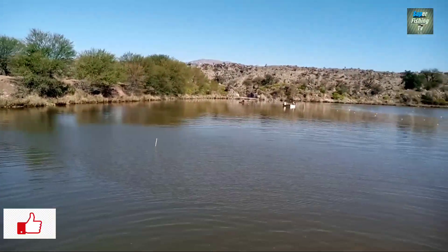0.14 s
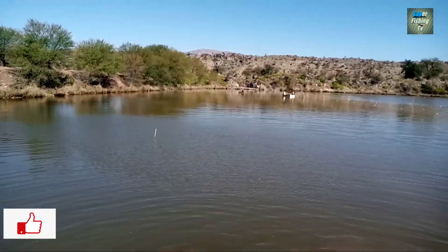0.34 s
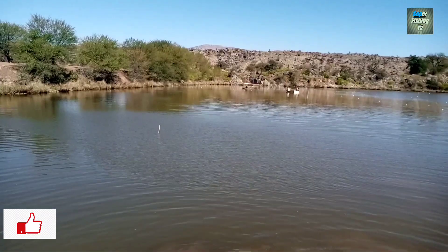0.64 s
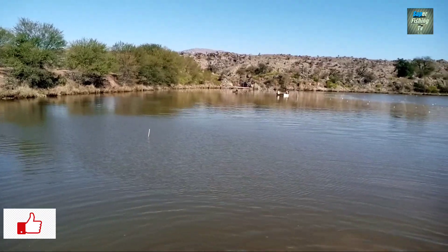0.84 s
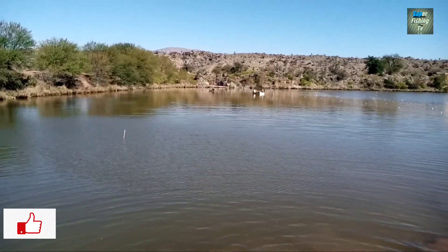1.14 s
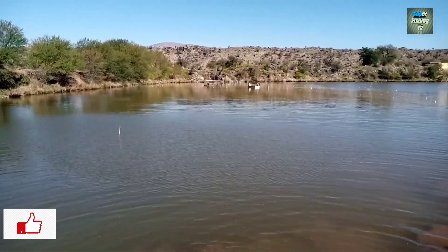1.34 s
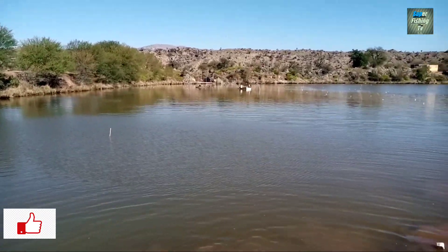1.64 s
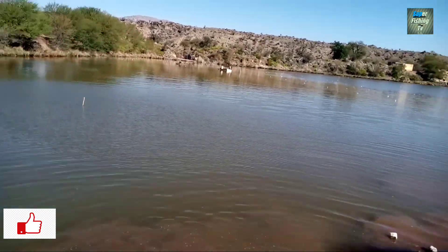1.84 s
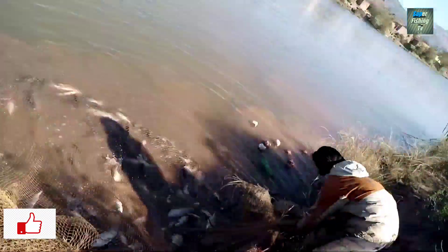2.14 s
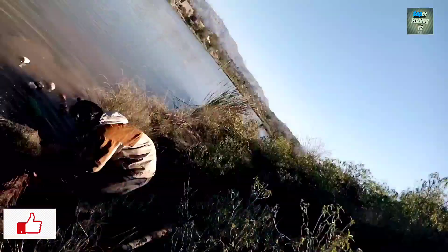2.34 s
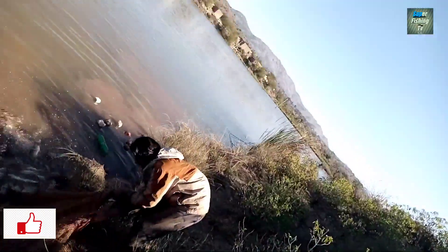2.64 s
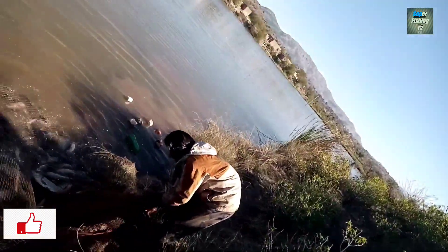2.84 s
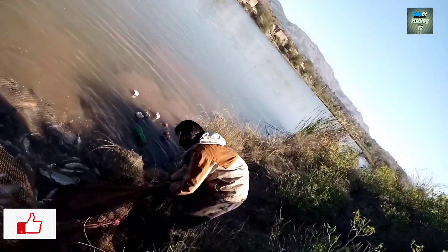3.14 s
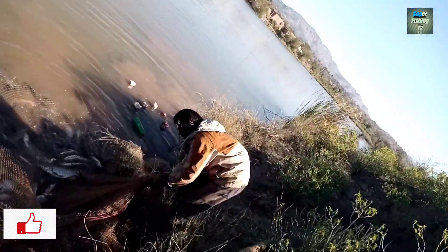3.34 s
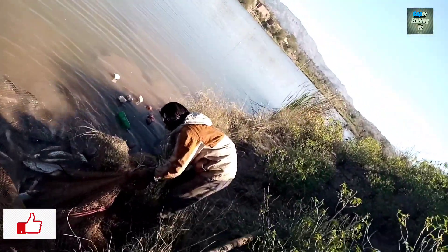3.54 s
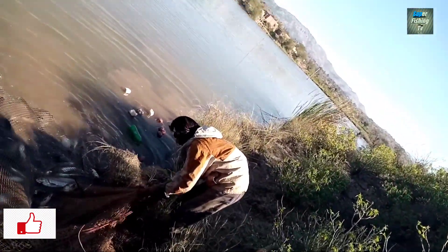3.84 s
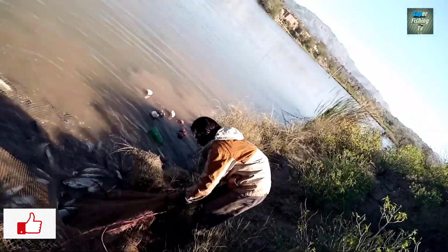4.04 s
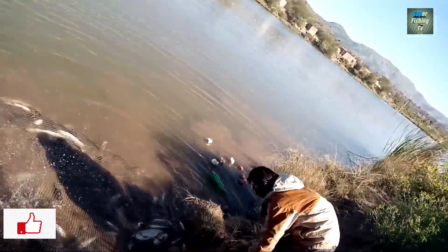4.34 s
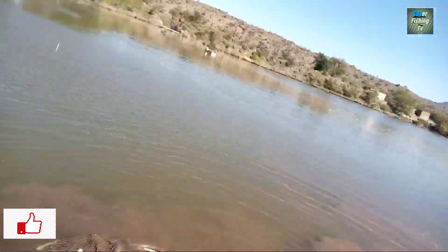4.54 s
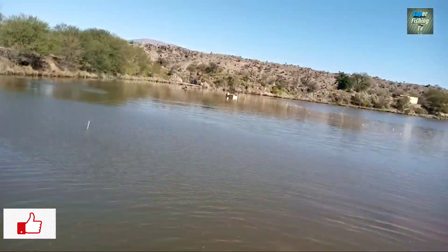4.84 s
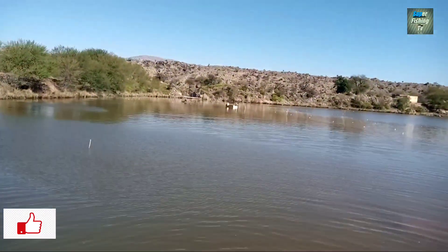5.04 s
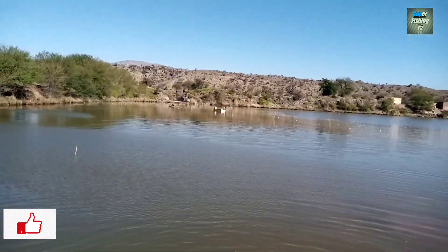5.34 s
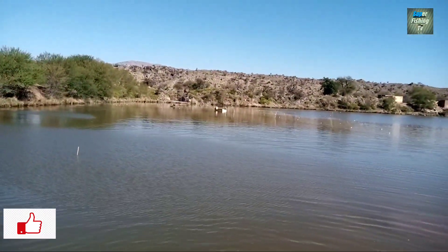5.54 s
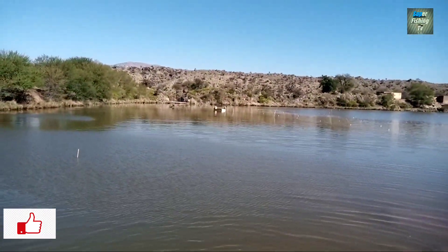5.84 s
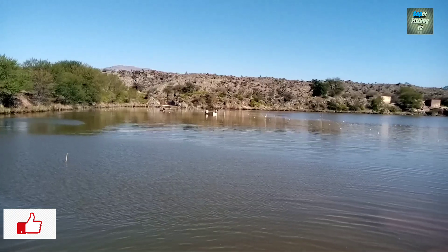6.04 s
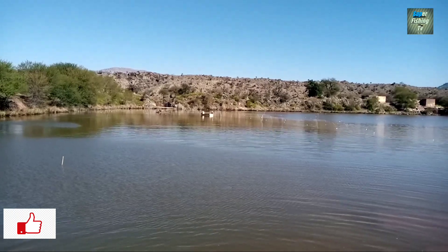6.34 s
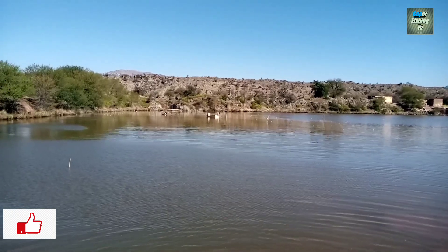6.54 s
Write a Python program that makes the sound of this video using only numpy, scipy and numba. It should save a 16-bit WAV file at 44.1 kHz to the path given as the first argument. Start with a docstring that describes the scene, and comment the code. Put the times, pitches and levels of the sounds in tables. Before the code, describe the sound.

At an open lake shore, a wet net drains close by. Bright, bubbly running water starts strongest and thins within a second. A quick, hard flurry of splashes hits near 1.5 seconds, then drips and small slaps. Trickling returns around 2.7 and 4.2 seconds, then leaves sparse plinks. Low wind puffs bump a phone microphone a metre or two away.

```python
"""A lake shore: a wet fishing net is hauled through the shallows, a metre or two from a phone.
Water streams off the mesh: swarms of damped sines for drops and bubbles, noise bands for fine spray.
Single bubbles and droplets ring as damped sines; drops and fish slap the surface as filtered noise bursts.
Wind on the microphone is low noise shaped by gusts, plus single-swing puffs; a faint hiss lies behind."""
import sys
import numpy as np
from scipy import signal
from scipy.fft import rfft, irfft
from scipy.io import wavfile
from scipy.ndimage import uniform_filter1d
from numba import njit

SR = 44100
rng = np.random.default_rng(int(sys.argv[2]) if len(sys.argv) > 2 else 0)


def output_pcm(signal):
    """Save a mono or channel-first signal as 16-bit PCM at the path in sys.argv[1].

    Samples are clipped to [-1, 1] before scaling.
    """
    pcm = np.clip(np.atleast_2d(signal).T, -1, 1) * 32767
    wavfile.write(sys.argv[1], SR, np.round(pcm).astype(np.int16))


N = 295068

# All levels are ahead of the microphone colour.
# water running off the net, before mix gains: time_s, spray_db, trickle_db, gurgle_db
NET_FLOW = [(0.0, -44, -44.5, -49), (0.2, -46.5, -51, -51), (0.6, -48, -55.5, -54.5),
            (0.84, -53, -60, -64.5), (1.0, -59.5, -62.5, -75.5), (1.55, -60.5, -68.5, -74.5),
            (1.88, -56, -64, -68), (2.42, -64.5, -66.5, -76.5), (2.53, -60, -60.5, -64),
            (2.63, -49.5, -54, -52), (2.85, -51.5, -54, -59), (3.1, -58.5, -69.5, -71),
            (3.33, -62, -72, -72.5), (3.55, -68, -78.5, -91), (3.9, -67, -66, -73), (4.0, -60, -62.5, -78),
            (4.12, -50, -53.5, -52.5), (4.3, -52, -57, -64.5), (4.62, -54.5, -63.5, -70.5),
            (4.79, -64.5, -78.5, -81), (4.95, -66.5, -83, -100), (5.07, -65.5, -67.5, -74.5),
            (5.19, -66.5, -76, -95), (5.33, -59.5, -57.5, -71), (5.44, -58.5, -62.5, -75),
            (5.68, -65, -68, -72.5), (5.82, -68.5, -87.5, -91.5), (6.0, -69.5, -79, -80),
            (6.1, -67, -63.5, -75.5), (6.26, -59, -64, -70), (6.4, -60.5, -63.5, -80),
            (6.69, -66, -70.5, -76)]
# bubbles that stand out, level before swell and fade, pitch at the start, rise reached at half the fade:
# start_s, level_db, pitch_hz, fade_60db_cycles, rise_share
SINGLE_BUBBLES = [(0.319, -34.5, 1046, 39, 0.12), (0.414, -32, 3187, 33, 0.17),
                  (0.435, -37, 1250, 23, 0.42), (0.669, -36.5, 1010, 27, 0.0), (0.775, -54, 580, 52, 0.86),
                  (0.807, -41, 1290, 17, 0.25), (0.863, -44, 792, 52, 0.0), (0.922, -42.5, 2750, 59, 0.029),
                  (0.99, -42.5, 1050, 71, 0.019), (1.067, -47, 612, 49, 0.0), (1.1, -44.5, 1170, 26, 0.17),
                  (1.159, -41.5, 3200, 54, 0.34), (1.169, -37.5, 1090, 51, 0.077),
                  (1.28, -39, 1000, 44, 0.16), (1.29, -44, 352, 28, 0.0), (1.365, -50.5, 2980, 90, 0.0),
                  (1.638, -50, 820, 38, 0.48), (1.672, -44.5, 319, 46, 0.44),
                  (1.675, -39.5, 1480, 37, 0.04), (1.678, -42, 3580, 90, 0.0),
                  (1.692, -45.5, 765, 28, 0.97), (1.731, -37, 485, 9, 0.15), (1.855, -39, 1060, 14, 0.14),
                  (1.879, -41, 2600, 59, 0.0), (1.897, -38, 895, 10, 0.39), (2.032, -53, 460, 81, 0.54),
                  (2.069, -38, 2760, 28, 0), (2.131, -48, 1500, 52, 0.78), (2.148, -48, 340, 29, 0.057),
                  (2.172, -47.5, 970, 60, 0.13), (2.208, -47.5, 2390, 63, 0.74),
                  (2.322, -50, 1160, 25, 0.27), (2.415, -45, 2820, 36, 0.0), (2.417, -51, 282, 32, 0),
                  (2.488, -49.5, 506, 44, 0.58), (2.525, -52, 248, 37, 0.38), (2.554, -42.5, 846, 35, 0.26),
                  (2.647, -28.5, 555, 13.5, 0.65), (2.763, -43, 736, 100, 0.97),
                  (2.869, -41, 2350, 54, 0.19), (2.912, -40.5, 590, 24, 0.15),
                  (2.966, -44.5, 444, 36, 0.019), (3.053, -56.5, 447, 62, 1), (3.085, -44.5, 2180, 56, 0.0),
                  (3.114, -54, 520, 34, 0.97), (3.151, -46, 1670, 36, 0.47), (3.231, -55.5, 642, 89, 0.3),
                  (3.326, -48.5, 2030, 50, 0.98), (3.359, -49.5, 1750, 39, 0.23),
                  (3.392, -53.5, 1490, 45, 0.24), (3.455, -55.5, 1580, 104, 0.96),
                  (3.497, -53.5, 675, 90, 0.06), (3.658, -55, 3208, 93, 0.0),
                  (3.724, -51.5, 2200, 52, 0.13), (3.738, -52.5, 1500, 96, 0.49),
                  (3.765, -49.5, 1340, 47, 0.36), (3.813, -51, 580, 44, 0.04), (3.827, -38.5, 2920, 27, 0),
                  (3.847, -56, 494, 102, 0.19), (3.965, -48.5, 724, 19, 0.025),
                  (3.983, -41.5, 2338, 28, 0.1), (4.076, -33, 570, 25, 0.58),
                  (4.08, -32.5, 1420, 21, 0.086), (4.135, -37, 3934, 58, 0), (4.211, -38.5, 470, 21, 0.015),
                  (4.326, -45, 920, 28, 0.49), (4.36, -47.5, 242, 27, 0.0054), (4.387, -47, 567, 67, 0.0),
                  (4.507, -40.5, 1572, 16, 0.04), (4.545, -44.5, 418, 24, 0.025),
                  (4.686, -50.5, 785, 97.5, 1), (4.733, -56.5, 910, 61, 0.43), (4.845, -55, 964, 50, 0.0),
                  (4.861, -43, 3020, 46, 0.079), (4.876, -40.5, 2180, 30, 0.21),
                  (4.973, -49.5, 1020, 73, 0.31), (4.997, -48, 1390, 49, 0.25),
                  (5.039, -51.5, 1950, 66, 0.0), (5.07, -49.5, 1040, 42, 0.72),
                  (5.098, -47.5, 787, 25, 0.0), (5.121, -46.5, 2397, 24, 0.0),
                  (5.153, -53, 1615, 41, 0.013), (5.216, -48.5, 1045, 52, 0.23),
                  (5.237, -48, 1080, 70, 0.18), (5.26, -56.5, 400, 40, 0.0), (5.261, -43, 3180, 47, 0.15),
                  (5.384, -36.5, 1020, 39, 0.01), (5.443, -49, 836, 34, 0.0), (5.469, -41, 2600, 68, 0.1),
                  (5.471, -45, 1870, 48, 0.0), (5.57, -44, 1300, 80, 0.0), (5.71, -54, 1270, 70, 0.0),
                  (5.814, -58, 1970, 73, 0.0), (5.855, -49, 2690, 58, 0.13), (5.881, -54, 3540, 55, 0.1),
                  (6.001, -59, 1036, 60, 0.045), (6.075, -46, 644, 75, 0.99), (6.172, -34.5, 985, 30, 0.45),
                  (6.248, -44.5, 874, 36, 0.16), (6.287, -48, 1020, 34, 0.61),
                  (6.349, -44.5, 2810, 84, 0.18), (6.386, -45, 2260, 54, 0.38),
                  (6.448, -48, 1130, 58, 0.0037), (6.529, -51, 710, 47, 0.0), (6.668, -49, 557, 57, 0.043),
                  (0.092, -22.5, 4270, 40, 0), (0.218, -43, 1190, 90, 0.25), (0.281, -43, 1080, 58, 1),
                  (0.565, -38.5, 900, 16, 0.16), (0.618, -47, 1305, 90, 0.0), (1.233, -59, 780, 88, 0.49),
                  (1.256, -55, 670, 69, 0.9), (1.398, -52, 1783, 36, 0.3), (1.522, -50, 2455, 90, 0.0),
                  (1.456, -30.5, 245, 7, 0), (1.46, -27, 348, 13, 0.025), (2.034, -44.5, 304, 4, 0.38),
                  (1.8, -59, 623, 40, 0.3), (1.93, -52, 1010, 40, 0.1), (2.25, -58.5, 707, 42, 0.35),
                  (1.715, -41, 3071, 34, 0.5), (1.762, -49, 2520, 90, 0.0), (1.865, -54, 420, 59, 0.9),
                  (1.997, -50, 1680, 42, 0), (2.398, -57.5, 820, 95, 0.62), (2.689, -50, 2280, 90, 0.0),
                  (2.695, -48, 427, 70, 0.68), (3.09, -42, 3640, 56, 0.77), (3.12, -53.5, 827, 46, 0.06),
                  (3.237, -52.5, 2040, 56, 0.0), (3.272, -54.5, 654, 45, 0.12),
                  (3.283, -55, 1840, 59, 0.17), (3.354, -58, 703, 60, 0.0), (3.505, -61, 1360, 90, 0.88),
                  (3.54, -63, 2360, 90, 0.0), (3.581, -62, 1077, 36, 0.86), (3.899, -56, 1970, 90, 0.0),
                  (3.969, -60, 313, 59, 0.0), (4.051, -49, 577, 78, 0.26), (4.086, -56, 175, 23, 0.1),
                  (4.342, -53, 600, 59, 0.94), (4.425, -53, 301, 44, 0.032), (4.595, -50, 1400, 51, 0.13),
                  (4.661, -58, 628, 88.5, 0.9), (4.885, -60, 910, 43, 0.0), (4.925, -57, 2020, 91, 0.061),
                  (5.25, -53, 770, 70, 0), (5.297, -53, 630, 34, 0.9), (5.308, -55, 976, 59, 0.25),
                  (5.333, -59, 650, 82, 0.6), (5.343, -57, 1160, 99, 0.34), (5.368, -42, 1160, 29, 0.0),
                  (5.405, -43.5, 830, 27, 0.0), (5.525, -56, 920, 23, 0.13), (5.684, -58, 2440, 58, 0.0),
                  (5.768, -61.5, 1990, 67, 0.0), (5.838, -63, 1050, 49, 0), (6.056, -46, 1330, 20, 0.99),
                  (6.073, -58, 1780, 86, 0.09), (6.295, -51, 544, 40, 0.0), (6.319, -52, 1670, 54, 0.99),
                  (6.403, -47, 980, 60, 0.1), (6.426, -53, 715, 41, 0.03), (6.638, -53, 1234, 66, 0.97),
                  (6.667, -45, 3270, 32, 0.0)]
# slaps on the surface, the quick run near 1.45 s a thrashing fish:
# mid_swell_s, crack_peak_db, crack_pitch_hz, body_peak_db
SURFACE_SLAPS = [(0.0888, -31, 4170, -50), (0.4132, -35, 3400, -39), (0.4324, -25, 6130, -43),
                 (0.5927, -30, 2800, -38.5), (0.7638, -34, 7450, -63), (0.804, -22.5, 4900, -38.5),
                 (1.2128, -42.5, 6400, -65), (1.436, -26, 4180, -37), (1.442, -25.5, 7300, -29.5),
                 (1.449, -23, 5300, -33.5), (1.455, -20.5, 6610, -33.5), (1.4599, -19.5, 2780, -24.5),
                 (1.465, -17.5, 4640, -28), (1.6593, -37, 3430, -57), (1.671, -32.5, 4470, -45),
                 (1.6806, -28.5, 6600, -43), (1.7328, -33.5, 6800, -46), (1.7684, -31.5, 9100, -42.5),
                 (1.8416, -39, 9030, -50), (1.963, -36.5, 7340, -66), (1.9927, -33.5, 4200, -68),
                 (2.0346, -40, 2950, -44), (2.0501, -36, 6100, -45), (2.0734, -35.5, 6300, -63),
                 (2.0995, -39.5, 5070, -68), (2.1602, -36, 8300, -49), (2.316, -36.5, 7040, -48),
                 (2.6132, -43, 2520, -46), (2.6278, -30.5, 3830, -37.5), (2.6722, -36, 9090, -44),
                 (2.7265, -45, 2690, -44), (2.7349, -30.5, 4630, -38.5), (2.8405, -27, 7500, -36),
                 (2.891, -38, 2600, -42), (2.9325, -24, 6850, -43), (2.9366, -35, 6500, -48),
                 (3.0265, -35.5, 4810, -63), (3.051, -37.5, 5960, -60), (3.0724, -38, 2990, -48),
                 (3.3575, -39, 4500, -59), (3.6248, -45, 3130, -73), (3.694, -48.5, 5900, -76),
                 (3.7983, -44, 2790, -56), (3.907, -46, 11150, -62), (3.9707, -41.5, 2550, -54),
                 (4.0476, -36.5, 5900, -39.5), (4.076, -36, 2680, -38), (4.1038, -46, 4330, -39.5),
                 (4.114, -42, 3340, -31.5), (4.1262, -29.5, 6230, -37.5), (4.1663, -37.5, 5800, -37),
                 (4.2677, -22, 9300, -32.5), (4.5525, -35, 4700, -63), (4.6947, -40.5, 4340, -49),
                 (4.9734, -37, 6100, -66), (5.1224, -39, 9600, -60), (5.1482, -42.5, 3600, -59),
                 (5.2766, -40.5, 4070, -56), (5.3683, -44, 2820, -54), (5.4151, -37, 4800, -56),
                 (5.686, -44.5, 4160, -69), (5.782, -57, 6100, -76), (6.164, -44, 3280, -46),
                 (6.5686, -39.5, 3430, -60)]
# droplets that tick loudest, level before swell and fade: start_s, level_db, pitch_hz
DROPLET_TICKS = [(0.433, -30, 10500), (0.5417, -31, 9000), (0.806, -21, 9400), (1.217, -40, 9700),
                 (1.3972, -45, 9300), (1.457, -15.5, 8830), (1.467, -20.5, 7100), (1.549, -39, 7750),
                 (1.6602, -35, 3330), (1.865, -40, 8900), (2.0945, -40, 9000), (2.728, -36, 8800),
                 (2.857, -32, 8700), (2.939, -27.5, 4470), (3.0525, -38, 6600), (3.1166, -39.5, 4670),
                 (3.244, -43, 9000), (3.2705, -43, 9500), (3.4671, -48, 7140), (3.5313, -50.5, 4560),
                 (3.606, -50, 4120), (3.696, -47, 9800), (3.909, -37, 11200), (4.103, -44, 5000),
                 (4.4201, -43, 4720), (4.5628, -37, 6600), (4.6646, -36, 9700), (4.7087, -35, 3900),
                 (4.8546, -46, 8750), (5.0295, -50, 4930), (5.1965, -47, 9800), (5.3248, -41, 9200),
                 (5.339, -40, 6500), (5.5746, -49, 4800), (5.6874, -44, 8400), (5.7828, -42.5, 6100),
                 (6.0401, -44.5, 8200), (6.164, -44, 9350), (6.2368, -43, 9100), (6.3926, -46, 5900),
                 (6.6663, -45, 4700)]
# gusts rumbling on the microphone, level before buffeting: peak_s, level_db, release_db_per_s
WIND_GUSTS = [(0.02, -61, 13), (0.33, -55.5, 41), (0.86, -74, 100), (1.07, -70, 300), (1.22, -64, 150),
              (1.38, -62, 300), (1.46, -54, 152), (1.63, -76, 54), (1.74, -60, 140), (1.81, -56, 93),
              (1.97, -62.5, 74), (2.13, -60.5, 100), (2.63, -72, 200), (2.74, -58, 200), (2.79, -62, 124),
              (3.53, -68, 168), (4.07, -79, 150), (4.22, -61, 200), (4.6, -70.5, 51), (5.03, -72.5, 58),
              (5.99, -51, 300), (6.06, -48.5, 298), (6.13, -53, 300), (6.19, -59.5, 300), (6.29, -59, 65),
              (6.47, -55, 100), (6.55, -46, 200), (6.66, -48.5, 100)]
# puffs of wind: start_s, peak_db, pitch_hz
WIND_PUFFS = [(0.311, -35, 120), (0.371, -44, 110), (1.452, -37, 141), (1.742, -40, 81),
              (1.769, -41.5, 154), (3.515, -59, 62.4), (5.979, -41, 110), (6.049, -45, 91),
              (6.12, -38, 126), (6.282, -50, 66), (6.549, -42, 126), (6.659, -49, 84)]
# microphone colour: freq_hz, gain_db
MIC_COLOUR = [(25, -10.5), (60, -6), (150, -5), (1500, 1.5), (3300, -1), (5600, -0.5), (6600, 2),
              (7800, -3), (9200, -0.5), (10800, -8), (12900, -13), (14000, -25.5), (14700, 1), (15500, -4)]

SWELL_SHARE = 0.038  # part of its 60 dB fade that a bubble takes to swell in
# the largest bubbles need a strong gurgle: level at SLOSH_REF_DB of gurgle, dB gained per dB of gurgle
SLOSH_DB, SLOSH_REF_DB, SLOSH_SLOPE = -53, -49.5, 1.43
SLAP_RISE_S, SLAP_T60_S = 0.0024, 0.022
# peak of the hollow under a body of -30 dB, dB gained per dB of body
HOLLOW_DB, HOLLOW_SLOPE = -31.5, 1.83
# lesser slaps and ticks at random: number per s, mean dB above the spray
SPATTER_PER_S, SPATTER_DB = 7.6, 11.5
PATTER_PER_S, PATTER_DB = 13, 15
GUST_ATTACK_DB_PER_S, CALM_DB, BUFFET_DB = 902, -90, 2.5
HISS_GAIN_DB = -78
TOP_HZ = 15500


def stream():
    """Spray and drips, bubbles in three sizes and a thin crowd of plinks, each following the flow."""
    spray_db, trickle_db, gurgle_db = curve(NET_FLOW)
    slosh_db = SLOSH_DB + SLOSH_SLOPE * (gurgle_db - SLOSH_REF_DB)
    drops = swarm(spray_db, full_db=-46, rate=4000, lo_hz=2900, hi_hz=15350, cycles=5.26, rise=0.39, spread_db=4.0)
    drips = swarm(spray_db, full_db=-50.5, rate=700, lo_hz=2290, hi_hz=10180, cycles=68, rise=0.26, spread_db=5.0)
    trickle = swarm(trickle_db, full_db=-50, rate=1600, lo_hz=933, hi_hz=2727, cycles=40.7, rise=0.29, spread_db=2.0)
    plinks = swarm(trickle_db, full_db=-59.5, rate=180, lo_hz=658, hi_hz=4206, cycles=51, rise=0.7, spread_db=1.0)
    gurgle = swarm(gurgle_db, full_db=-51.5, rate=800, lo_hz=434.5, hi_hz=996, cycles=35, rise=0.402, spread_db=1.5)
    slosh = swarm(slosh_db, full_db=-53, rate=340, lo_hz=155.7, hi_hz=425, cycles=24, rise=0.62, spread_db=3.5)
    # the wash drops faster than the spray once the spray is thin
    wash_db = spray_db + np.minimum(0.27 * (spray_db + 59), 0)
    spray = 0.61 * drops + 0.32 * drips + 0.95 * undb(wash_db) * wash()
    # a thin flow comes off the mesh in spurts, a full one runs evenly
    spurt_db = np.clip(0.21 * (-49.5 - trickle_db), 0, 4)
    bubbling = undb(spurt_db * walk(25)) * (0.77 * trickle + gurgle)
    # plinks stop growing once the trickle passes -57 dB
    plink_gain = 0.52 * np.minimum(undb(-57 - trickle_db), 1)
    return spray + bubbling + plink_gain * plinks + slosh


def swarm(flow_db, full_db, rate, lo_hz, hi_hz, cycles, rise, spread_db):
    """Random bubbles between two pitches, most small, a few large; they thin out as the flow drops below full."""
    time_u, pitch_u, size_u, life_u, rise_u, keep_u = rng.random((int(rate * N / SR), 6)).T
    share = np.clip(undb(0.6 * (flow_db - full_db)), 0.07, 1)
    at = (time_u * N).astype(int)
    hz = lo_hz * (hi_hz / lo_hz) ** pitch_u
    size = undb(spread_db * np.minimum(-np.log(1 - size_u), 4.0))
    size = size * (keep_u < share[at]) / np.sqrt(share[at])  # fewer bubbles, same power
    rings = ring(N, at / SR, size, hz, cycles * (0.5 + life_u), rise * rise_u, SWELL_SHARE, np.ones(N), 1. * SR)
    return undb(flow_db) * unit(rings)


def wash():
    """Countless tiny drops: half-octave noise bands that surge together and also flutter alone."""
    surge_db = 1.65 * walk(16) + 1.59 * walk(70)
    out = 0
    for hz in 2200 * 2 ** np.arange(0, 3, 0.5):
        noise = band(rng.standard_normal(N), hz, hz * np.sqrt(2), order=3)
        out = out + undb(surge_db + 2.6 * walk(40)) * noise
    return unit(out)


def bubbles():
    """Bubbles that stand out one by one, each a trapped air pocket ringing down."""
    s, db, hz, cycles, rise = np.transpose(SINGLE_BUBBLES) * 1.
    waver = 1 + 0.039 * walk(150)
    return ring(N, s, undb(db), hz, cycles, np.clip(rise, 0, 2), SWELL_SHARE, waver, 1. * SR)


@njit
def ring(n, start, size, hz, cycles, rise, swell, waver, sr):
    """Damped sines that swell in, climb in pitch as the bubble nears the surface and waver with the ripples."""
    y = np.zeros(n)
    for k in range(len(start)):
        length = cycles[k] * sr / hz[k]  # samples to fade 60 dB
        fade = np.exp(-np.log(1000.) / length)
        climb = (1 + rise[k]) ** (2 / length)
        amp, step, phase = size[k], 2 * np.pi * hz[k] / sr, 0.
        first = int(start[k] * sr)
        for i in range(first, min(n, first + int(0.8 * length))):
            y[i] += amp * np.sin(phase) * min((i - first) / (swell * length), 1.)
            phase += min(step * waver[i], 2.8)  # stay below Nyquist
            amp *= fade
            step *= climb
    return y


def slaps():
    """Each slap is a coloured crack, a duller body and the hollow it punches; scattered drops fall back after it."""
    out, age_s = np.zeros(N), np.arange(int(0.2 * SR)) / SR
    n = len(age_s)
    # the first drops land ahead of the main blow, so it swells in over twice the rise time
    swell = np.minimum(age_s / (2 * SLAP_RISE_S), 1) ** 2
    after = np.maximum(age_s - 2 * SLAP_RISE_S, 0) / SLAP_T60_S
    blow = swell * undb(-60 * after)
    fall = swell * undb(-13.5 - 7.9 * after)
    s, db, hz, u = scattered(SPATTER_PER_S, SPATTER_DB, 2600, 9040)
    lesser = zip(s + SLAP_RISE_S, db, hz, db - 1 - 16 * u)
    for mid_s, crack_db, crack_hz, body_db in [*SURFACE_SLAPS, *lesser]:
        a, b, c = rng.standard_normal((3, n))
        crack = 1.27 * unit(band(a, 1800, 17700)) + 0.38 * unit(band(a, crack_hz / 1.175, crack_hz * 1.18))
        body = band(b, 590, 2400, order=3)
        # the hollow rings on briefly after the blow that excites it
        hollow = peak(band(c * blow, 210, 546), HOLLOW_DB + HOLLOW_SLOPE * (body_db + 30))
        # falling drops: random level steps of 200 samples
        spatter = fall * np.repeat(undb(4.5 * c[:n // 200 + 1]), 200)[:n]
        slap = peak(crack * (blow + spatter), crack_db) + peak(body * (blow + 1.13 * fall), body_db) + hollow
        i = max(int((mid_s - SLAP_RISE_S) * SR), 0)
        out[i:i + n] += slap[:N - i]
    return out


def ticks():
    """Each droplet traps a tiny bubble that rings for a few milliseconds."""
    lesser = scattered(PATTER_PER_S, PATTER_DB, 3800, 13000)[:3]
    s, db, hz = np.hstack([np.transpose(DROPLET_TICKS), lesser])
    cycles = 50.0 * np.sqrt(hz / 6000)
    waver = 1 + 0.073 * walk(1500)
    return ring(N, s, undb(db), hz, cycles, np.full(len(s), 0.1), SWELL_SHARE, waver, 1. * SR)


def wind():
    """A low rumble that jumps up and dies away with each gust; puffs push the diaphragm through about one swing."""
    t, power = np.arange(N) / SR, undb(2 * CALM_DB)
    for s, db, release in WIND_GUSTS:
        drop_db = np.maximum(GUST_ATTACK_DB_PER_S * (s - t), release * (t - s))
        power = power + undb(2 * (db - drop_db))
    rumble = unit(band(band(rng.standard_normal(N), 40, 123), 40, 123))
    out = np.sqrt(power) * undb(BUFFET_DB * walk(30)) * rumble
    for s, db, hz in WIND_PUFFS:
        turn = np.arange(int(2.2 * SR / hz)) * hz / SR
        puff = undb(db) * np.hanning(len(turn)) * np.cos(2 * np.pi * (turn - 1.1))
        i = int(s * SR)
        out[i:i + len(puff)] -= puff[:N - i]
    return out


def shore_hiss():
    """Faint hiss of the open shore: steady white noise plus a fluctuating treble band."""
    noise = rng.standard_normal(N)
    treble = undb(1.4 * walk(30)) * band(noise, 2000, 18000)
    return undb(HISS_GAIN_DB) * (treble + 0.55 * noise)


def scattered(per_s, above_db, lo_hz, hi_hz):
    """Random events (time_s, level_db, pitch_hz, chance 0-1) whose level follows the spray."""
    time_u, level_u, pitch_u, chance = rng.random((int(per_s * N / SR), 4)).T
    at = (time_u * N).astype(int)
    level_db = curve(NET_FLOW)[0][at] + above_db + 13.0 * (level_u - 0.5)
    return at / SR, level_db, lo_hz * (hi_hz / lo_hz) ** pitch_u, chance


def walk(rate_hz):
    """Random values held 1 / rate_hz s and slewed; spread near 1."""
    k = int(SR / rate_hz)
    held = np.repeat(rng.standard_normal(N // k + 1), k)
    return 1.23 * uniform_filter1d(held, k)[:N]


def curve(table):
    """Columns of a table as one value per sample."""
    s, *columns = np.transpose(table)
    return [np.interp(np.arange(N) / SR, s, c) for c in columns]


def band(x, lo_hz, hi_hz, order=2):
    """Butterworth band-pass."""
    return signal.sosfilt(signal.butter(order, [lo_hz, hi_hz], "bandpass", fs=SR, output="sos"), x)


def undb(db):
    """Gain of a level in dB."""
    return 10 ** (np.asarray(db) / 20)


def unit(x):
    """Scale to rms 1."""
    return x / np.sqrt(np.mean(x ** 2))


def peak(x, db):
    """Scale to a peak level."""
    return x * undb(db) / np.abs(x).max()


def scene():
    """Water near the phone, wind on it and the hiss of the shore; one channel."""
    return (stream() + bubbles() + slaps() + ticks() + wind() + shore_hiss())[None]


def record(dry):
    """Causal microphone colour with a dip below a high port resonance, then the top is cut."""
    hz, db = np.transpose(MIC_COLOUR)
    grid_hz = np.maximum(np.arange(1025) * SR / 2048, 1)
    gain_db = np.interp(np.log(grid_hz), np.log(hz), db)
    # fold the cepstrum for minimum phase
    cepstrum = irfft(np.log(undb(gain_db)))
    cepstrum[1:1024] *= 2
    cepstrum[1025:] = 0
    impulse = irfft(np.exp(rfft(cepstrum)))
    coloured = signal.fftconvolve(dry, impulse[None])[:, :N]
    return signal.sosfilt(signal.ellip(10, 0.2, 60, TOP_HZ, fs=SR, output="sos"), coloured)


dry = scene()
out = record(dry)
output_pcm(out)
```